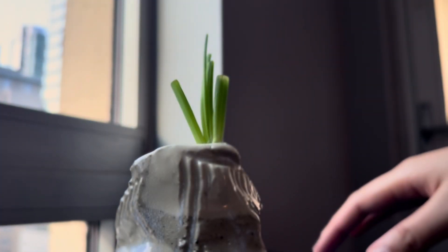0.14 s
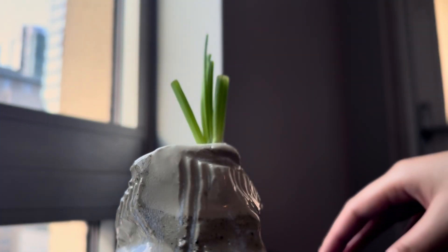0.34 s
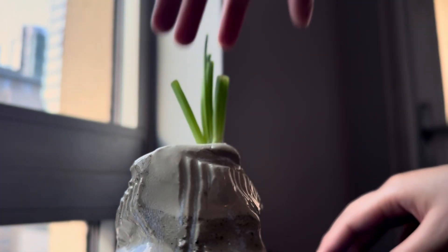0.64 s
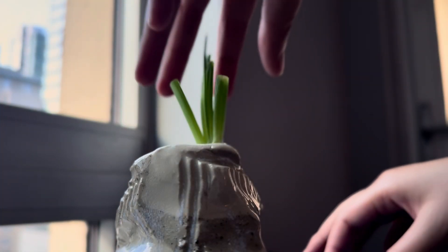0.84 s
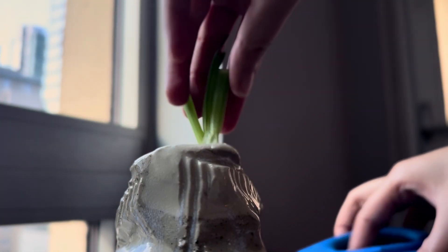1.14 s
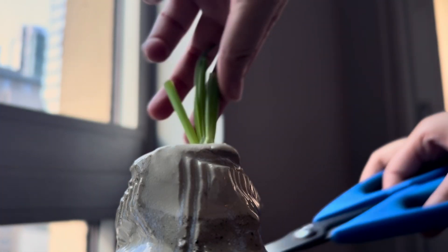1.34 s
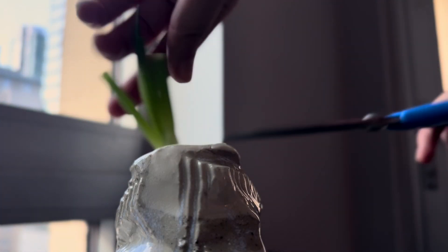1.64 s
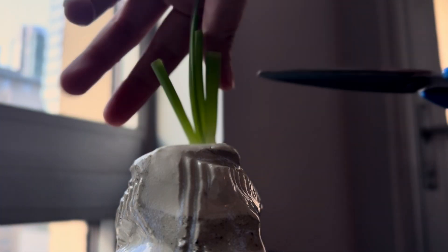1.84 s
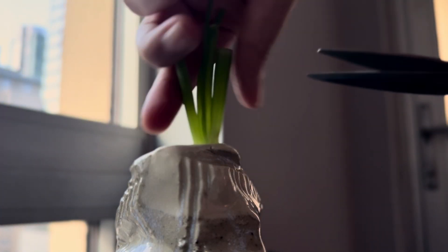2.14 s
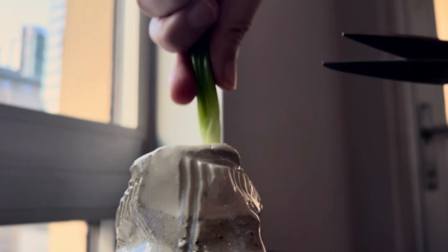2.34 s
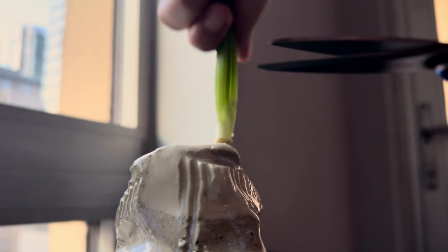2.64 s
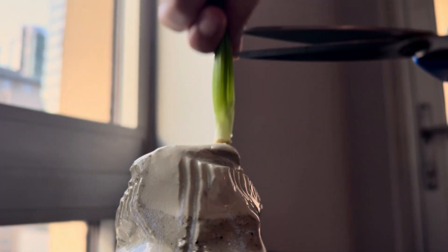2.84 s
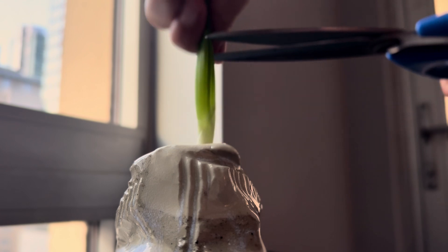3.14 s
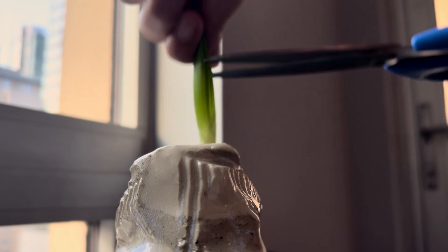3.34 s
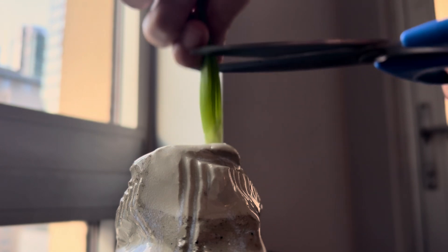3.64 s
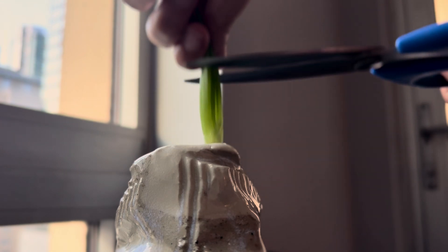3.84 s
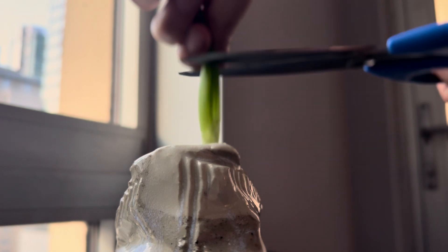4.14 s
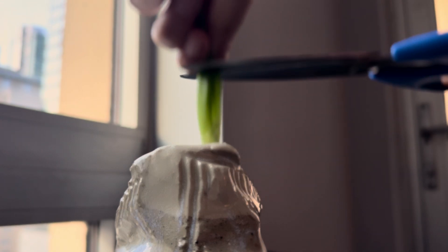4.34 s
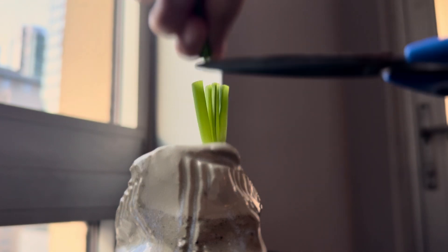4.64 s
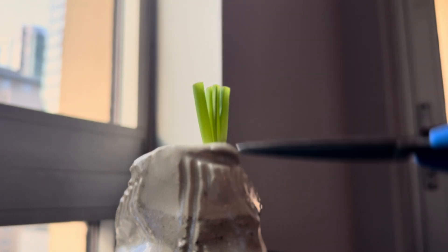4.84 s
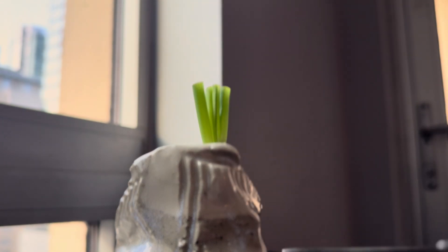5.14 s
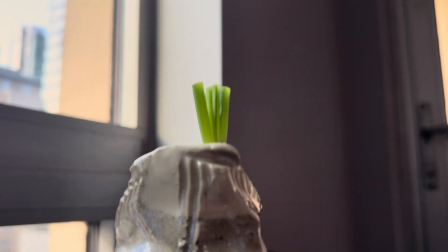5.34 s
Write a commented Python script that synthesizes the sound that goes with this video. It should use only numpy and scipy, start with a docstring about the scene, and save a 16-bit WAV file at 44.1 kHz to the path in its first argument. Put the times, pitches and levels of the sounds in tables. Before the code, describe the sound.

Plastic handles and steel clatter and stutter across resonant wood, loud against a hushed, gently humming room. Then much quieter detail: stalks rubbed in the hand, a brief hiss of opening blades, sparse fibre ticks. A short juicy snip bursts out with a bright steel click. Near the end, light knocks and a thin scrape lead to one hard knock on the sill. Heard very close, with slight small-room echo.

```python
"""Cutting green onions with scissors

Scissors are dragged off a wooden windowsill, opened, closed through a bunch of stalks and set down again.
Knocks and drags ring the wood; the blades click with dying sine waves and puffs of noise.
Rustles, scrapes and the crunch are crowds of tiny noise puffs; single snaps are short bright ones.
A small quiet room, heard from close by, adds echoes, low rumble, wavering hum and faint hiss."""
import sys
import numpy as np
from scipy import signal
from scipy.fft import rfft, irfft, next_fast_len
from scipy.io import wavfile

SR = 44100
rng = np.random.default_rng(int(sys.argv[2]) if len(sys.argv) > 2 else 0)


def bounce(signal):
    """Save signal as a 16-bit WAV file at the path given by the first command-line argument."""
    frames = np.transpose(np.atleast_2d(signal))
    limited = np.clip(frames, -1, 1)
    pcm = np.round(limited * 32767).astype(np.int16)
    wavfile.write(sys.argv[1], SR, pcm)


N = 242978  # samples in the scene
TIME = np.arange(N) / SR

# Levels below are set before the room echoes and the microphone ports.
# Colours are spectra that give only the balance of pitches: pitch_hz, level_db (per Hz)

# Rumble and hiss of the quiet room: pitch_hz, level_db (per Hz)
RUMBLE_COLOUR = [(12, -39), (20, -13), (60, 4), (87, -1.5), (102, -12), (139, -7), (162, -4), (189, -12),
                 (257, -13), (300, -10.5), (326, -15), (362, -16), (408, -17.5), (977, -29), (1200, -63),
                 (1560, -80), (2640, -120)]
HISS_COLOUR = [(650, -32), (1100, 4.5), (1260, -1), (1760, -5.5), (2610, -11.5), (3150, -23), (4270, -17),
               (5050, -16), (6390, -11.5), (8540, -23.5), (10500, -23), (13200, -27.5), (16000, -26)]
RUMBLE_DB, HISS_DB = -47.0, -71.5  # average (rms) levels
# Extra hiss on the left: pitch_hz, left_minus_right_db
HISS_SIDE = [(1100, 1.5), (2500, 4.5), (6000, 13), (9000, -2)]
# Hum tones, average level before they waver: pitch_hz, level_db
HUM_TONES = [(57, -64), (76, -70), (193, -61), (229, -65), (298, -67), (361, -70.5)]
# Changing strength of the drone, before it wavers: time_s, level_db
DRONE_LEVEL = [(0, -42.5), (.5, -43), (.65, -49), (2, -60), (3.1, -51), (3.5, -60.5), (4.7, -51),
               (5.5, -55.5)]
DRONE_HZ = 135.7

# Fingers find the handles: start_s, length_s, level_db, fade_db (over the length)
BRUSHES = [(.288, .13, -62.5, -12), (.67, 0.21, -68.5, 0)]
# Colour of the fingers' brush: pitch_hz, level_db (per Hz)
BRUSH_COLOUR = [(900, 4.5), (1500, 8), (3000, -2), (4600, 2.5), (6500, -6), (10000, -14), (12000, -26),
                (16000, -21)]
BRUSH_ATTACK_S, BRUSH_RELEASE_S = .015, .03
# Short shoves over the sill, before DRAG_DB: start_s, length_s, level_db, fade_db (over the length)
SHOVES = [(.893, 0.036, -21, 0), (.94, 0.054, -25, -4), (1.005, .195, -26.5, 1.5), (1.215, .038, -23, 2.5),
          (1.299, 0.054, -15.5, -13)]
DRAG_ATTACK_S, DRAG_RELEASE_S = 0.011, 0.01
DRAG_DB = -5.5  # for both the judder and the ringing wood
# Colour of the juddering slide: pitch_hz, level_db (per Hz)
SLIDE_COLOUR = [(90, -17.5), (130, -2), (170, -1.5), (300, -2.5), (470, -4.5), (615, -20), (680, -22),
                (800, -16.5), (1100, -25), (1450, -38), (2000, -43.5), (2600, -39.5), (3300, -50),
                (4400, -40.5), (6000, -60), (10000, -51.5), (16000, -84)]
# Force of the slips on the wood: pitch_hz, level_db (per Hz)
GRIP_COLOUR = [(130, 8), (250, -0.5), (480, 7.5), (640, 4), (1100, -2.5), (2500, -2.5)]

# Ringing pitches of the sill, relative levels: pitch_hz, level_db, t60_s (fall by 60 dB), left_minus_right_db
SILL_MODES = [(87, -4.5, 0.04, -24.5), (117, -16, 0.16, 6), (184.8, 4, 0.085, -2),
              (236, -5.5, 0.053, -23.5), (292.2, -4.5, 0.17, 12), (357, -4, 0.19, -7.5),
              (441.4, 5.5, 0.03, 7.5), (518, -2, 0.038, 0), (611, -17.5, 0.25, -6), (745, -24.5, 0.99, 2),
              (835.5, -17.5, 0.11, 17), (937, -3.5, 0.036, 8), (1070, -10, 0.11, 11),
              (1580, -25, 0.083, -8)]
# Scissors knock on the sill: start_s, peak_db, blow_centre_hz, clack_db
KNOCKS = [(.295, -50, 490, -52), (.538, -36.5, 350, -66), (.656, -33.5, 303, -42.5),
          (.707, -27, 315, -37.5), (.77, -27, 280, -41), (.8925, -18.5, 250, -25), (.915, -16, 465, -27),
          (1.0026, -14, 366, -26), (1.031, -16, 239, -61), (1.073, -36, 402, -28), (1.21, -17, 164, -39),
          (1.2231, -21, 208, -27.5), (1.243, -15, 486, -32), (1.298, -16.5, 238, -19.5),
          (1.3125, -19, 522, -23), (1.325, -13.5, 369, -22), (5.1333, -29.5, 755, -36.5),
          (5.141, -26.5, 510, -27.5), (5.15, -24.5, 112, -54), (5.172, -27.5, 96, -60),
          (5.303, -32.5, 587, -42), (5.366, -33, 485, -50), (5.381, -28.5, 91, -46),
          (5.4124, -5, 439, -14.5), (5.4153, -4, 179, -27.5)]
TICK_DB = -18  # the tick of steel in a knock, relative to its clack
# Colour of the handles' clack: pitch_hz, level_db (per Hz)
CLACK_COLOUR = [(300, 4), (550, 11.5), (690, 8), (880, 6.5), (1200, 2), (1420, -5.5), (1700, -8.5),
                (2300, -19), (2800, -20), (3400, -30.5), (6000, -46)]
# Colour of the knock's steel tick: pitch_hz, level_db (per Hz)
TICK_COLOUR = [(1500, -22), (2400, -4.5), (5500, 0.5), (10000, -13), (12000, -35), (16000, -13)]

# Blades and handles click: start_s, ring_db, sharp_tick_db
CLICKS = [(1.63, -54, -45.5), (2.0431, -62, -35.5), (4.4292, -26.5, -35.5), (4.589, -61, -48),
          (4.5973, -64, -46.5), (5.4106, -37, -23)]
# Ringing pitches of the scissors, relative levels: pitch_hz, level_db, t60_s
STEEL_MODES = [(2370, -19, .012), (2530, -2, 0.031), (2967, 13.5, 0.02), (3230, -5, 0.012),
               (4820, 9, 0.0095), (5010, 10, 0.021), (5830, 8, 0.013), (8100, -22, 0.0089)]
# Colour of the sharp click: pitch_hz, level_db (per Hz)
CLICK_COLOUR = [(1500, -6), (3000, -6.5), (5000, 0.5), (7500, -3), (10000, -2), (12000, -10.5),
                (16000, -21)]

# Stalks rub in the hand and along the blades: start_s, length_s, level_db, fade_db (over the length)
RUBS = [(.672, 0.055, -69, -2), (1.073, 0.011, -53, -3), (1.61, 0.021, -64, 4), (1.848, 0.03, -66, 0),
        (1.9, 0.038, -53.5, -9), (1.987, 0.052, -64.5, -7), (2.17, 0.013, -60, -4),
        (2.695, 0.025, -51.5, 1.5), (2.757, 0.021, -58, -3), (2.87, 0.081, -65.5, 0),
        (3.032, 0.033, -60, -8), (3.1, 0.014, -62.5, -3), (3.43, 0.028, -64, -2), (3.495, 0.015, -59, 3),
        (3.746, 0.0098, -54.5, -13), (3.808, 0.017, -66.5, -9), (3.95, 0.029, -63, 0),
        (4.044, .025, -62, -4.5)]
# Colour of the rustle: pitch_hz, level_db (per Hz)
RUSTLE_COLOUR = [(1000, -17), (2500, -4), (3300, -11), (4100, 3.5), (5500, -13), (7000, -1), (10000, 2.5),
                 (12000, -10), (14500, 0), (16000, 3.5)]
RUB_ATTACK_S, RUB_RELEASE_S = 0.01, 0.0053
# Strokes of the blades, as changing loudness: time_s, level_db
OPENING_LEVEL = [(2.415, -66), (2.428, -51), (2.48, -53.5), (2.525, -57), (2.55, -63.5), (2.6, -59),
                 (2.67, -79)]
CUT_LEVEL = [(4.2, -66), (4.25, -52), (4.333, -50), (4.353, -42), (4.37, -41.5), (4.402, -44.5),
             (4.415, -58), (4.43, -69)]
SCRAPE_LEVEL = [(5.27, -75), (5.3, -57.5), (5.325, -53.5), (5.36, -58), (5.41, -61)]
# Colours of those strokes: pitch_hz, level_db (per Hz)
OPENING_COLOUR = [(530, -41), (900, -1.5), (991, 0.5), (1250, -12.5), (2250, -7.5), (3550, -15.5),
                  (4150, -11.5), (13800, -10), (16000, -17)]
CUT_COLOUR = [(470, -30), (800, -15), (978, -6.5), (1170, -18), (1410, -19), (3470, -15.5), (4030, -11.5),
              (6330, -14.5), (9450, -5.5), (11600, -14), (15000, -10), (16000, -13)]
SCRAPE_COLOUR = [(880, -31), (1500, -7), (2970, -5.5), (3250, -17), (3380, -10), (3840, -3), (10100, -9.5),
                 (14600, -13), (16000, -17)]

# Single fibres snap or catch on the blades, before the snap trims: start_s, peak_db, body_relative_db
SNAPS = [(1.8488, -47, -5), (1.8665, -53, 0), (1.9291, -58.5, 9.5), (2.0048, -52, -1), (2.1865, -48.5, 2),
         (2.4002, -44, -12), (2.426, -42.5, 3), (2.4997, -34, -22), (2.5353, -30.5, -40), (2.716, -40, -18),
         (2.7571, -43.5, -7), (2.8835, -43, -30), (3.2727, -45.5, -35), (3.3162, -52, -3),
         (3.3363, -49, -14), (3.3986, -47.5, -7), (3.436, -41, -19), (3.4448, -46.5, -11),
         (3.4783, -46.5, -3.5), (3.5124, -49, -11), (3.5757, -46, -37), (3.5996, -34.5, -28),
         (3.6192, -39.5, -18), (3.9048, -43, -13), (3.9787, -47, -11), (4.012, -50, -13), (4.046, -51, -5),
         (4.1986, -46, -26), (4.211, -49, -10), (4.3122, -37, -29), (4.349, -31, -18), (4.3552, -21.5, -23),
         (4.382, -35, -17), (4.3966, -39.5, 1.5)]
SNAP_TRIM_DB, BODY_TRIM_DB = 2.0, -4.0
# Colour of the bright snap: pitch_hz, level_db (per Hz)
SNAP_COLOUR = [(1000, -93), (4000, -7), (6500, -16), (8000, -2), (10000, 5), (12000, -12.5), (14500, 3.5),
               (16000, -4)]
# Colour of the duller pop: pitch_hz, level_db (per Hz)
SNAP_BODY_COLOUR = [(500, -4), (1200, 2.5), (2500, 2), (4200, -10.5), (6500, 2), (10000, -22)]
# Faint snaps while the hand squeezes the bunch; strongest level and spread below it, before the trims
SQUEEZE_START_S, SQUEEZE_END_S, FAINT_COUNT = 2.7, 4.2, 36
FAINT_DB, FAINT_RANGE_DB, FAINT_BODY_DB = -51.5, 14, -20

# How alike the noise is on the two sides: pitch_hz, likeness (1 is the same, 0 unrelated)
LIKENESS = [(30, 0.9), (100, 1), (300, 0.47), (700, 0.061), (1500, 0.074), (5000, 0.18), (8000, 0.89),
            (16000, 1)]
# How long the room rings: pitch_hz, t60_s
ROOM_DECAY = [(100, 0.65), (400, 0.56), (1000, 0.61), (3000, 0.94), (6000, 0.66), (10000, 0.44),
              (16000, 0.43)]
# Loudness difference of the two microphone ports: pitch_hz, left_minus_right_db
PORT_BALANCE = [(30, 3.5), (70, 0), (150, 4.5), (400, 0), (900, 0.5), (2300, 2.5), (5000, 5), (9000, 2.5),
                (13000, -1)]
# Timing difference of the ports: pitch_hz, left_lead_radians
PORT_PHASE = [(30, 0), (75, 0), (200, -0.05), (450, -0.72), (950, -2), (2300, -3), (5000, -3.5), (9800, -5),
              (12000, -7.5), (16000, -3.5)]
EDGE_HZ = 16000  # upper limit of the sound


def amp(db):
    """Turns decibels into a gain."""
    return 10 ** (np.asarray(db) / 20)


def evened(x):
    """Scales a sound to an average (rms) level of 1."""
    return x / np.sqrt(np.mean(x ** 2) + 1e-20)


def peaked(x):
    """Scales a stereo sound so that the average of its two sides peaks at 1."""
    return x / abs(x.mean(0)).max()


def read(points, hz):
    """Reads a curve between its points, along a logarithmic pitch axis."""
    point_hz, value = np.transpose(points)
    return np.interp(np.log(hz + 1), np.log(point_hz + 1), value)


def level(rows):
    """Turns a dB curve over time into a gain that fades to silence just outside its span."""
    time_s, db = np.transpose(rows)
    outside_s = np.maximum(np.maximum(time_s[0] - TIME, TIME - time_s[-1]), 0)
    return amp(np.interp(TIME, time_s, db)) * np.exp(-(outside_s / 0.011) ** 2)


def pushes(rows, attack_s, release_s):
    """Gain of hand movements: each swells quickly, changes evenly in dB while it lasts, then dies away."""
    gain = np.zeros(N)
    for start_s, length_s, db, fade_db in rows:
        t = TIME - start_s
        swell = np.clip(1 + t / attack_s, 0, 1) ** 2  # the swell comes just before the start
        release = np.exp(-np.maximum(t - length_s, 0) / release_s)
        strength = amp(db + fade_db * np.clip(t / length_s, 0, 1))
        gain = np.maximum(gain, swell * release * strength)
    return gain


def add(mix, start_s, sound):
    """Mixes a stereo sound in at the given time."""
    part = mix[:, round(start_s * SR):][:, :sound.shape[1]]
    part += sound[:, :part.shape[1]]


def liken(x, hz):
    """Spectra of two unrelated sides, mixed so that they are as alike as LIKENESS says at each pitch."""
    left, other = rfft(x)
    alike = np.clip(read(LIKENESS, hz), -1, 1)
    right = alike * left + np.sqrt(1 - alike ** 2) * other
    return np.array([left, right])


def colour(x, points, size=2048):
    """Likens the two sides, then filters them to a spectrum that falls steeply below its lowest point."""
    length = next_fast_len(x.shape[1])
    padded = np.pad(x, ((0, 0), (0, length - x.shape[1])))
    both = irfft(liken(padded, np.fft.rfftfreq(length, 1 / SR)), length)
    hz = abs(np.fft.fftfreq(size, 1 / SR))
    gain = amp(read(points, hz)) * np.minimum(hz / points[0][0], 1) ** 3
    # minimum phase: the filter responds at once, with nothing ahead of the sound
    response = np.exp(np.conj(signal.hilbert(np.log(gain + 1e-5))))
    taps = np.fft.ifft(response).real
    return signal.fftconvolve(both, taps[None], axes=1)[:, :x.shape[1]]


def burst(points, t60, size=4096):
    """A brief contact: a dying puff of coloured noise with a peak of 1."""
    puff = rng.standard_normal((2, size)) * amp(-60 * TIME[:size] / t60)
    return peaked(colour(puff, points) * np.linspace(1, 0, size))


def grains(points, per_s, spread_db, t60, size=1024):
    """A random train of tiny uneven slips, each a short puff of coloured noise; average (rms) level 1."""
    sizes = amp(spread_db * np.minimum(rng.exponential(1, N), 4))
    slips = sizes * (rng.random(N) < per_s / SR)
    puff_power = amp(-60 * TIME[:size] / t60) ** 2
    power = signal.oaconvolve(slips ** 2, puff_power)[:N]
    noise = rng.standard_normal((2, N)) * np.sqrt(abs(power))
    return evened(colour(noise, points))


def ring(modes, scatter, size=20000):
    """A struck object rings with one dying sine per mode, a little out of step on the two sides."""
    hz, db, t60 = np.transpose(modes)[:3, :, None]
    t = TIME[:size]
    sides = np.array([1, -1])[:, None, None]
    skew = sides * rng.standard_normal(hz.shape) * np.minimum(scatter * hz / 1000, 1)
    return amp(db - 60 * t / t60) * np.sin(2 * np.pi * hz * t + skew)


def room(x, wet_db, count=8):
    """Walls return a few near reflections and a sparse tail whose pitches die at their own speeds."""
    taps = rng.standard_normal((2, SR)) * (rng.random((2, SR)) < 4000 / SR) * (TIME[:SR] > .005)
    hz, t, bands = signal.stft(taps, SR, nperseg=256)
    decay = amp(-60 * t / read(ROOM_DECAY, hz)[:, None])
    tail = signal.istft(bands * decay, SR, nperseg=256)[1]
    tail /= np.linalg.norm(tail[0])
    near = (rng.uniform(.002, .02, (2, count)) * SR).astype(int)
    tail[np.arange(2)[:, None], near] += 0.31 * rng.choice([-1, 1], near.shape)
    return x + amp(wet_db) * signal.fftconvolve(x, tail, axes=1)[:, :N]


def tone(pitch_hz, waver):
    """A sine whose phase and strength drift slowly at random."""
    hz = np.fft.rfftfreq(N, 1 / SR)
    slow = rfft(rng.standard_normal((2, N))) / (1 + (hz / 2.87) ** 4)
    drift = evened(irfft(slow, N))
    sine = np.sin(2 * np.pi * pitch_hz * TIME + waver * drift[0])
    return np.sqrt(2) * sine * amp(3.7 * waver * drift[1])


def background():
    """Low rumble from outdoors and faint hiss are shaped noise; a machine hum is a set of wavering sines."""
    hz = np.fft.rfftfreq(N, 1 / SR)
    noise = liken(rng.standard_normal((2, N)), hz)
    rumble_gain = amp(read(RUMBLE_COLOUR, hz)) / (1 + (hz / 1400) ** 6)
    rumble = evened(irfft(noise * rumble_gain, N)) * amp(RUMBLE_DB)
    hiss_db = read(HISS_COLOUR, hz) + np.outer([.5, -.5], read(HISS_SIDE, hz))
    hiss = evened(irfft(noise * amp(hiss_db), N)) * amp(HISS_DB)
    hum = sum(amp(db) * tone(pitch_hz, waver=0.91) for pitch_hz, db in HUM_TONES)
    drone = level(DRONE_LEVEL) * tone(DRONE_HZ, waver=1.0)
    return rumble + hiss + hum + drone


def drag():
    """Fingers brush the handles, which then stick and slip over the wood and set its modes ringing."""
    brush = grains(BRUSH_COLOUR, per_s=2900, spread_db=2.0, t60=.006)
    brush = brush * pushes(BRUSHES, BRUSH_ATTACK_S, BRUSH_RELEASE_S)
    pull = pushes(SHOVES, DRAG_ATTACK_S, DRAG_RELEASE_S)
    judder = grains(SLIDE_COLOUR, per_s=460, spread_db=3.0, t60=0.021) * pull
    slips = grains(GRIP_COLOUR, per_s=240, spread_db=0.0, t60=0.0068) * pull
    wood = signal.fftconvolve(slips, ring(SILL_MODES, scatter=0.28).sum(1), axes=1)[:, :N]
    wood = evened(wood) * np.std(judder)  # as strong as the judder
    dragged = brush + amp(DRAG_DB) * (judder + wood)
    return room(dragged, wet_db=-11.0) * amp([[1.2], [-1.2]])  # a little louder on the left


def knocks():
    """Each knock rings the sill, with a clack of the plastic handles and a tick of steel."""
    wood, hard = np.zeros((2, 2, N))
    sides = amp(np.outer([.5, -.5], np.transpose(SILL_MODES)[3]))[:, :, None]
    for start_s, db, centre_hz, clack_db in KNOCKS:
        # a blow feeds the modes near its centre: soft ones the low modes, hard ones the high
        band_hz = [centre_hz / 1.37, centre_hz * 1.272]
        blow = signal.butter(2, band_hz, "bandpass", fs=SR, output="sos")
        thud = signal.sosfilt(blow, (sides * ring(SILL_MODES, scatter=0.54)).sum(1))
        add(wood, start_s, amp(db) * peaked(thud))
        add(hard, start_s, amp(clack_db) * burst(CLACK_COLOUR, t60=0.04))
        add(hard, start_s, amp(clack_db + TICK_DB) * burst(TICK_COLOUR, t60=0.028))
    return room(wood, wet_db=-9.0) + room(hard, wet_db=-6.5)


def clicks():
    """The blades meet their stop with a noisy tick and ring briefly, damped by the hand."""
    steel, tick = np.zeros((2, 2, N))
    for start_s, ring_db, tick_db in CLICKS:
        add(steel, start_s, amp(ring_db) * peaked(ring(STEEL_MODES, scatter=0.1).sum(1)))
        add(tick, start_s, amp(tick_db) * burst(CLICK_COLOUR, t60=0.022))
    steel[1] = np.roll(steel[1], 6)  # the ring reaches the right side 6 samples later
    return room(steel, wet_db=-16) + room(tick, wet_db=-5.0)


def rustle():
    """Stalks rub in the hand and on the blades in many tiny uneven slips."""
    rubbing = grains(RUSTLE_COLOUR, per_s=1100, spread_db=4.0, t60=0.0087)
    return rubbing * pushes(RUBS, RUB_ATTACK_S, RUB_RELEASE_S)


def opening():
    """The blades slide open past each other in a crowd of slips."""
    return grains(OPENING_COLOUR, per_s=910, spread_db=2.0, t60=0.013) * level(OPENING_LEVEL)


def scrape():
    """Steel grazes the sill in a dense crowd of slips."""
    return grains(SCRAPE_COLOUR, per_s=3300, spread_db=1, t60=0.0092) * level(SCRAPE_LEVEL)


def cut():
    """Bursting cells make longer puffs and fibres shorter ones; together they crunch."""
    cells = grains(CUT_COLOUR, per_s=270, spread_db=1.0, t60=0.038)
    fibres = grains(CUT_COLOUR, per_s=260, spread_db=3, t60=0.003)
    return evened(cells + fibres) * level(CUT_LEVEL)


def strokes():
    """The rubbing, sliding and cutting sounds share one set of room echoes."""
    return room(rustle() + opening() + cut() + scrape(), wet_db=-10.5)


def snaps():
    """A fibre gives way with a very short bright tick and a duller pop of the stalk."""
    out = np.zeros((2, N))
    faint = []
    for when, weakness in rng.random((FAINT_COUNT, 2)):
        start_s = SQUEEZE_START_S + when * (SQUEEZE_END_S - SQUEEZE_START_S)
        faint.append((start_s, FAINT_DB - FAINT_RANGE_DB * weakness, FAINT_BODY_DB))
    for start_s, db, body_db in list(SNAPS) + faint:
        t60 = .0015 + .025 * amp(body_db)  # snaps with more body last longer
        add(out, start_s, amp(db + SNAP_TRIM_DB) * burst(SNAP_COLOUR, t60))
        add(out, start_s, amp(db + body_db + BODY_TRIM_DB) * burst(SNAP_BODY_COLOUR, t60=0.063))
    return room(out, wet_db=-13.5)


def scene():
    """All sources together."""
    return background() + drag() + knocks() + clicks() + strokes() + snaps()


def record(dry):
    """Two microphone ports hear different levels and phases; a filter then removes the highest pitches."""
    size = next_fast_len(N + 4096)  # spare room so that the end does not wrap onto the start
    hz = np.fft.rfftfreq(size, 1 / SR)
    half = np.array([[.5], [-.5]])
    ports = amp(half * read(PORT_BALANCE, hz)) * np.exp(1j * half * read(PORT_PHASE, hz))
    heard = irfft(rfft(dry, size) * ports, size)[:, :N]
    band_limit = signal.firwin(401, EDGE_HZ, window=("kaiser", 8), fs=SR)
    return signal.oaconvolve(heard, band_limit[None], "same")


dry = scene()
out = record(dry)
bounce(out)
```